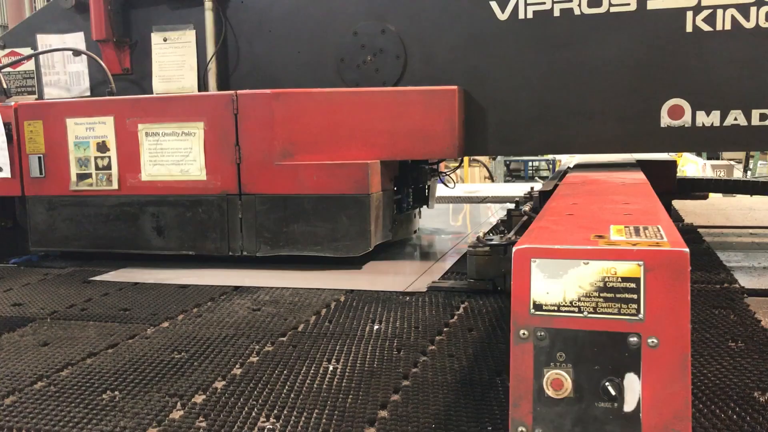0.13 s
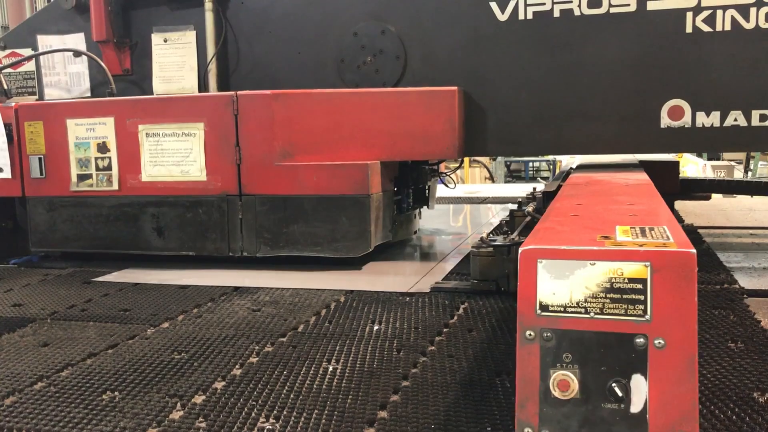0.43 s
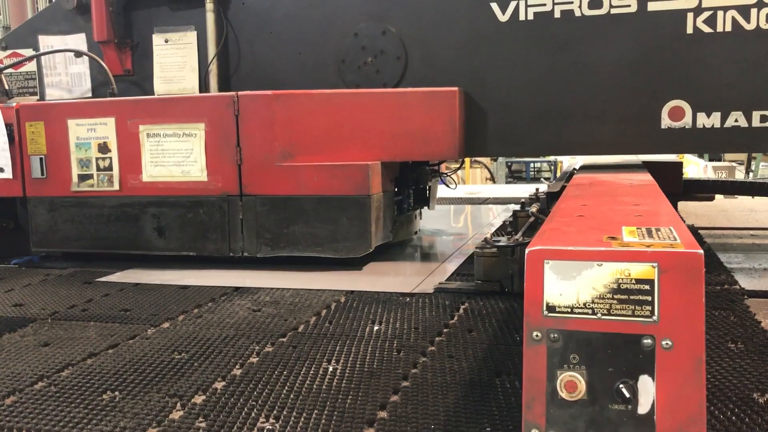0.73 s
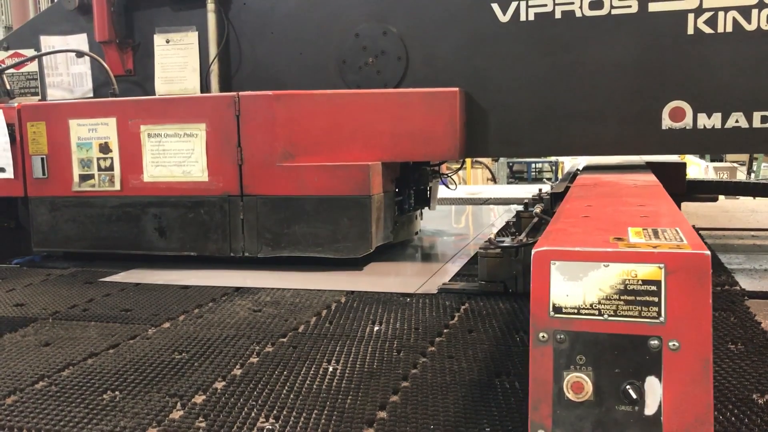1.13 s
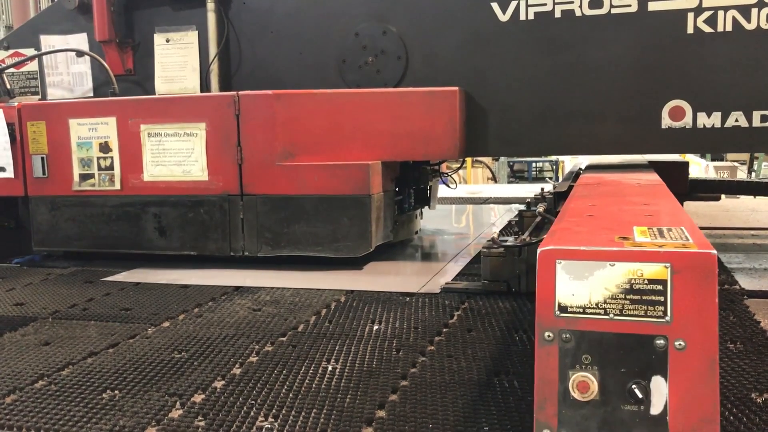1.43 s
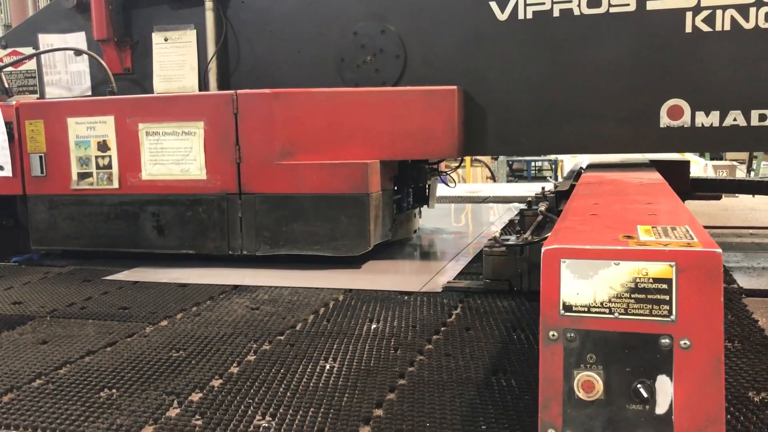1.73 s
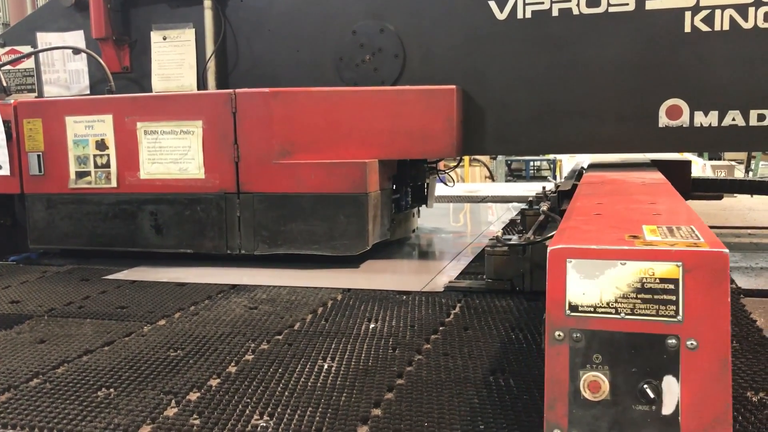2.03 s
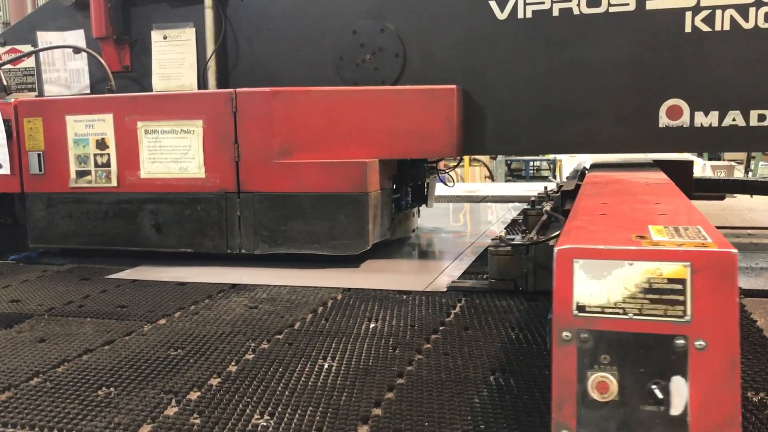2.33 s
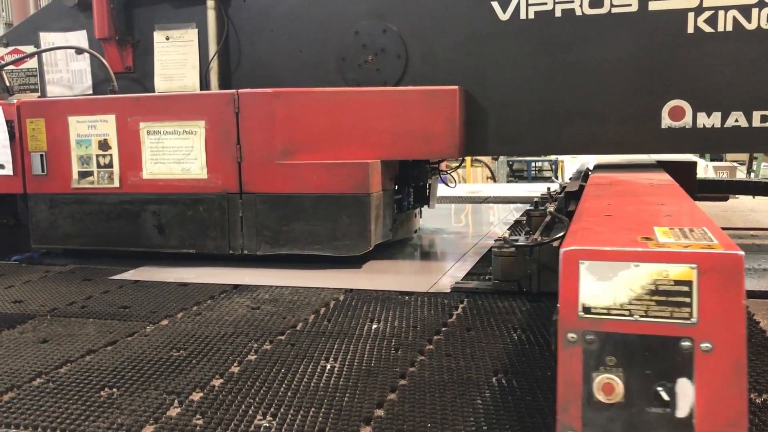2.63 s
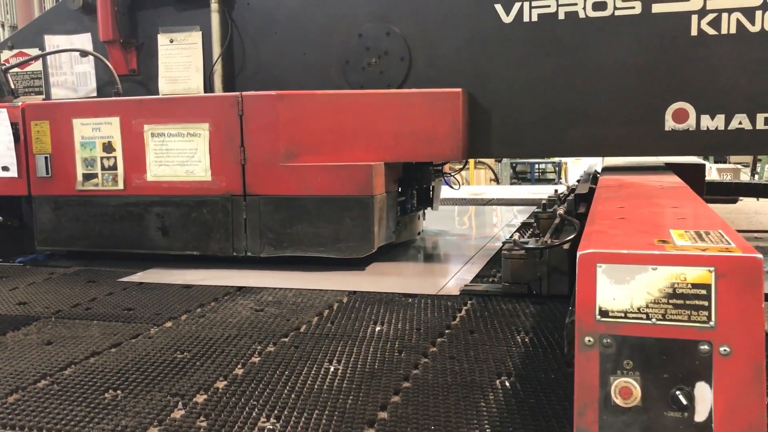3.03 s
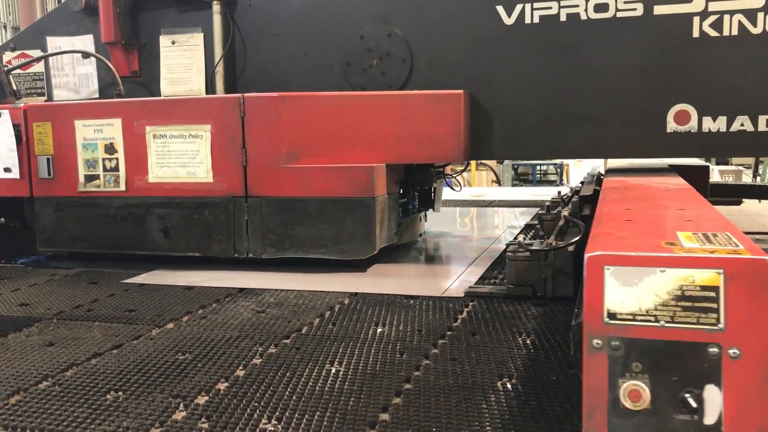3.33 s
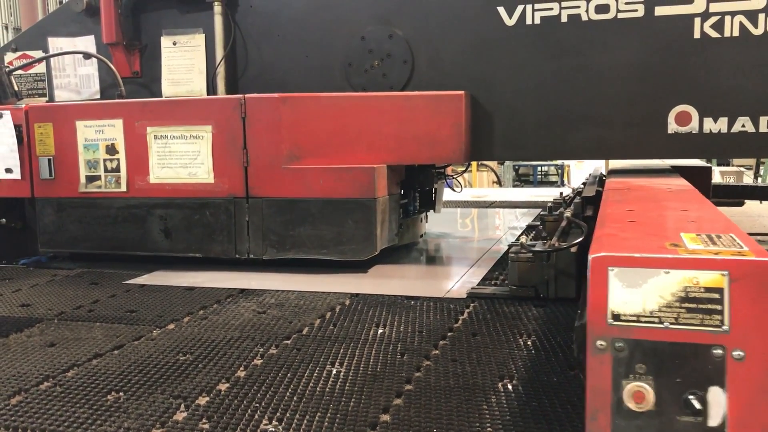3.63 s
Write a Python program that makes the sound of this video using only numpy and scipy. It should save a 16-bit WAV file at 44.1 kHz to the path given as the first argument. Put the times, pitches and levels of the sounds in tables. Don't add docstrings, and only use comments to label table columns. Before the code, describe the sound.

A punch press pounds sheet metal in a workshop, about three strokes a second. After a tiny silence and stuttered start around 0.1 s, each stroke gives a deep groaning thump, sharp snap, sheet slap and clattering return. The sheet rattles; high whines and faint whistles burst irregularly over pump hum. Compressed air sighs at 1.5-2.1 s, with a low pump moan from 1.8 to 2.8 s. Punching continues to the end.

```python
import sys
import numpy as np
from scipy import signal
from scipy.io import wavfile

SR = 44100
rng = np.random.default_rng(int(sys.argv[2]) if len(sys.argv) > 2 else 0)


def int16_out(signal):
    q = np.round(np.clip(np.atleast_2d(signal).T, -1, 1) * 32767)
    wavfile.write(sys.argv[1], SR, q.astype(np.int16))


def ratio(d):
    e = np.asarray(d, float) / 20
    return 10 ** e


N = 166698


def rms_one(x):
    return x / np.sqrt(np.mean(x ** 2) + 1e-20)


def drift(rate_hz):
    r = np.exp(-80 * np.pi * rate_hz / SR)
    slow = signal.lfilter([1], [1, -2 * r, r * r], rng.standard_normal(N // 40 + 2002))[2000:]
    return np.interp(np.arange(N) / 40, np.arange(len(slow)), rms_one(slow))


def resonate(x, hz, width_hz):
    r = np.exp(-np.pi * width_hz / SR)
    return signal.lfilter([1, 0, -1], [1, -2 * r * np.cos(2 * np.pi * hz / SR), r * r], x)


def band_pass(x, low_hz, high_hz):
    return signal.sosfilt(signal.butter(2, [low_hz, high_hz], "band", fs=SR, output="sos"), x)


def swell(t, attack_s, hold_s, release_s):
    time_left = attack_s + hold_s + release_s - t
    ramp = np.clip(np.minimum(t / attack_s, time_left / release_s), 0, 1)
    return np.sin(np.pi / 2 * ramp) ** 2


SHOP_DB, SHOP_PATCHY_DB = -29, 0.23
# hz, density_db (per Hz)
SHOP_COLOUR = [(20, -17.5), (165, .5), (437, -20.5), (1090, -19.5), (4200, -25.5), (7300, -36.5),
               (11000, -31), (15800, -45)]


def shop():
    out, edges_hz = 0, 22 * 2 ** np.arange(0, 9.6, .5)
    white = rng.standard_normal((2, N))
    points = np.array(SHOP_COLOUR)
    for k, (low_hz, high_hz) in enumerate(zip(edges_hz, edges_hz[1:])):
        band = band_pass(white[k % 2], low_hz, high_hz)
        level_db = np.interp(np.log(low_hz * high_hz) / 2, np.log(points[:, 0]), points[:, 1])
        out = out + ratio(level_db + SHOP_PATCHY_DB * drift(12.0)) * band
    return ratio(SHOP_DB) * rms_one(out)


HUM_PATCHY_DB = 2.0
# pitch_hz, width_hz, level_db (rms)
HUMS = [(58.2, 11, -39), (266.1, 14.4, -37.5), (536.6, 5.7, -48.5), (619, 68, -52), (1093, 11.6, -49.5),
        (1376.5, 46, -49.5), (2887, 42, -56), (3654, 230, -49), (6205, 460, -54.5), (9800, 34, -75),
        (10970, 820, -55.5)]


def hums():
    out = np.zeros(N)
    for hz, width_hz, level_db in HUMS:
        once = resonate(rng.standard_normal(N), hz, width_hz)
        hum = rms_one(resonate(once, hz, width_hz))
        out += ratio(level_db + HUM_PATCHY_DB * drift(9.8)) * hum
    return out


MOAN_EDGE_S = .04
# start_s, hold_s, pitch_hz, peak_db
MOANS = [
    (1.594, 0.095, 268, -29),
    (1.783, 1, 58.2, -34.5),
    (1.9, 0.37, 80.6, -38),
    (2.083, 0.11, 266, -34),
]


def moans():
    t, out = np.arange(N) / SR, np.zeros(N)
    for start_s, hold_s, hz, peak_db in MOANS:
        level = ratio(peak_db + HUM_PATCHY_DB * drift(8.5)) * swell(t - start_s, MOAN_EDGE_S, hold_s, MOAN_EDGE_S)
        out += level * np.sin(2 * np.pi * hz * t)
    return out


# time_s, level_db
AIR = [
    (1.52, -28),
    (1.6, -1.5),
    (1.67, 1.5),
    (1.78, -3),
    (1.901, -5),
    (2.1, -17),
]
# low_hz, high_hz, level_db
AIR_BANDS = [
    (604, 4300, -33.5),
    (4860, 7000, -41.5),
    (3210, 9500, -47),
]


def air():
    hiss = np.zeros(N)
    for low_hz, high_hz, level_db in AIR_BANDS:
        hiss += ratio(level_db) * rms_one(band_pass(rng.standard_normal(N), low_hz, high_hz))
    time_s, valve_db = np.transpose(AIR)
    return ratio(np.interp(np.arange(N) / SR, time_s, valve_db, left=-120, right=-120)) * hiss


def whine(bursts, hz, wander_hz, flutter_db, idle_db):
    t, level = np.arange(N) / SR, np.full(N, ratio(idle_db))
    for top_s, half_s, level_db in bursts:
        near = slice(int((top_s - half_s) * SR), int((top_s + 1.3 * half_s) * SR))
        since_start = t[near] - top_s + .8 * half_s
        level[near] += ratio(level_db) * swell(since_start, .55 * half_s, .45 * half_s, .9 * half_s)
    turns = np.cumsum(hz + wander_hz * drift(18.7)) / SR
    flutter = ratio(flutter_db * (drift(13) + drift(69)))
    return np.sqrt(2) * level * flutter * np.sin(2 * np.pi * turns)


# top_s, half_length_s, level_db
WHINE = [(0.141, 0.027, -34), (0.2, 0.09, -39.5), (0.258, 0.015, -38), (0.386, 0.03, -43),
         (0.483, 0.02, -32), (0.507, 0.023, -39.5), (0.583, 0.076, -36), (0.649, 0.013, -42),
         (0.703, 0.016, -38.5), (0.739, 0.028, -43), (0.82, 0.021, -36.0), (0.842, 0.014, -48),
         (0.914, 0.072, -37.5), (1.039, 0.022, -38), (1.088, 0.031, -40.5), (1.126, 0.018, -43.2),
         (1.153, 0.032, -35.5), (1.229, 0.037, -40.5), (1.499, 0.041, -33), (1.574, 0.063, -39),
         (1.723, 0.022, -39), (1.768, 0.059, -44), (1.819, 0.037, -38), (1.905, 0.023, -43),
         (1.954, 0.033, -36.5), (1.986, 0.026, -33.8), (2.039, 0.026, -38), (2.064, 0.019, -45),
         (2.123, 0.02, -45), (2.145, 0.027, -31.5), (2.17, 0.02, -46), (2.247, 0.017, -35.5),
         (2.277, 0.033, -32), (2.304, 0.02, -40), (2.396, 0.03, -33.5), (2.424, 0.02, -38.9),
         (2.517, 0.095, -34), (2.574, 0.022, -48), (2.602, 0.015, -39), (2.705, 0.02, -38),
         (2.732, 0.021, -33.5), (2.781, 0.043, -41), (2.823, 0.029, -31), (2.849, 0.018, -39.7),
         (2.903, 0.065, -34), (2.953, 0.031, -45), (3.049, 0.03, -44), (3.124, 0.019, -39),
         (3.224, 0.044, -34.5), (3.275, 0.015, -32.5), (3.376, 0.02, -41.4), (3.452, 0.045, -45.2),
         (3.493, 0.02, -43), (3.531, 0.021, -32), (3.564, 0.029, -28.5), (3.586, 0.017, -44.3),
         (3.609, 0.033, -36.5), (3.636, 0.028, -44.0), (3.713, 0.021, -37.4), (3.74, 0.022, -33.2)]
# top_s, half_length_s, level_db
WHISTLE = [(0.169, 0.038, -49), (0.21, 0.019, -43), (0.232, 0.02, -51), (0.47, 0.018, -55),
           (0.575, 0.081, -50.5), (0.705, 0.017, -51.4), (0.823, 0.014, -53.8), (0.871, 0.02, -52.8),
           (0.894, 0.02, -45), (1.039, 0.017, -58), (1.191, 0.069, -58), (1.378, 0.021, -51),
           (1.625, 0.069, -51), (1.709, 0.016, -47), (1.828, 0.051, -49.1), (1.944, 0.085, -55),
           (2.051, 0.028, -54), (2.143, 0.04, -57), (2.283, 0.07, -51), (2.393, 0.029, -52),
           (2.484, 0.028, -50.9), (2.576, 0.038, -50), (2.885, 0.041, -46.5), (2.922, 0.023, -55),
           (3.039, 0.034, -55), (3.135, 0.023, -54.2), (3.201, 0.1, -48), (3.374, 0.031, -53.2),
           (3.48, 0.024, -49.2), (3.518, 0.025, -52.7), (3.547, 0.033, -41.5), (3.581, 0.02, -46.4),
           (3.607, 0.022, -52.4), (3.731, 0.028, -49.2)]


def drives():
    main = whine(WHINE, 4588, wander_hz=10, flutter_db=1.4, idle_db=-53)
    whistle = whine(WHISTLE, 8066, wander_hz=6, flutter_db=1.5, idle_db=-62)
    upper = whine(WHISTLE, 8144, wander_hz=6, flutter_db=1.23 * 1.5, idle_db=-62 + 15)
    return main + whistle + ratio(-13) * upper


RATTLES_PER_S, RATTLE_DB, RATTLE_CYCLES = 600, -45, 10.6
RATTLE_LOW_HZ, RATTLE_HIGH_HZ, RATTLE_RINGS = 494, 1940, 16


def rattle():
    sizes = ratio(3.75 * np.minimum(rng.exponential(1, N), 4)) * rng.choice([-1, 1], N)
    ticks = sizes * (rng.random(N) < RATTLES_PER_S * ratio(4 * drift(9)) / SR)
    dealt = rng.integers(0, RATTLE_RINGS, size=N)
    rings = np.zeros(N)
    for k, hz in enumerate(np.geomspace(RATTLE_LOW_HZ, RATTLE_HIGH_HZ, RATTLE_RINGS)):
        rings += resonate(ticks * (dealt == k) + 1e-18, hz, 2.9 * hz / RATTLE_CYCLES)
    return ratio(RATTLE_DB) * rms_one(rings)


CONTACT_RISE_S, CONTACT_SPREAD_DB = .003, 1.2
SAME_EACH_TIME = .3
# break_through_s, slap_db (slap of the sheet as the ram lifts)
STROKES = [(0.0381, -4.5), (0.372, -3), (0.7062, -6), (1.0402, -5), (1.374, -1), (1.708, 0), (2.042, 1),
           (2.3752, -1), (2.7083, 1), (3.041, 0), (3.3746, 1), (3.7073, 0.1)]
# after_break_through_s, centre_hz, width_hz, level_db (rms), t60_s
CONTACTS = [(-.006, 1300, 500, -35, .2), (-.011, 2500, 2000, -35, .2), (-.010, 7000, 6000, -44, .1),
            (.0, 6000, 2500, -38, .12), (.0, 9800, 2000, -43, .12), (-.001, 13000, 5000, -44, .07),
            (.0, 600, 400, -37, .4), (-.036, 13000, 4000, -47, .05), (.061, 11500, 6000, -44, .08),
            (.064, 6000, 2500, -42, .3), (.068, 620, 400, -35, .35), (-.022, 3650, 200, -38, .35),
            (.127, 1100, 600, -33, .18), (.126, 1500, 400, -37, .3), (.127, 2500, 2000, -37, .3),
            (.13, 600, 300, -32, .25), (.132, 6200, 4000, -48, .4), (.14, 400, 120, -33, .3),
            (.07, 2500, 2000, -39, .3), (.145, 480, 250, -35, .15), (.137, 1350, 500, -36, .15),
            (.01, 430, 200, -37, .2), (-.0012, 8000, 7000, -31, .02), (-.0012, 13500, 4000, -42, .02)]


def contacts():
    size = SR // 3
    t, out = np.arange(size) / SR, np.zeros(N + 2 * SR)
    for after_s, hz, width_hz, level_db, t60_s in CONTACTS:
        noise = rng.standard_normal((len(STROKES) + 1, size))
        mixed = np.sqrt(SAME_EACH_TIME) * noise[0] + np.sqrt(1 - SAME_EACH_TIME) * noise[1:]
        clatter = rms_one(resonate(mixed, hz, width_hz))
        clatter *= np.minimum(t / CONTACT_RISE_S, 1) * ratio(level_db - 60 * t / t60_s)
        for (stroke_s, _), one, chance in zip(STROKES, clatter, rng.standard_normal(len(STROKES))):
            i = int((stroke_s + after_s) * SR) + SR
            out[i:i + size] += ratio(CONTACT_SPREAD_DB * chance) * one
    return out[SR:SR + N]


KNOCK_RISE_CYCLES, KNOCK_DETUNE = 2.5, .015
# after_break_through_s, pitch_hz, peak_db, t60_s
KNOCKS = [
    (-.0008, 5730, -23, 0.011),
    (-.0008, 9800, -26.5, 0.0071),
    (-.005, 1075, -28, .07),
    (-.004, 930, -32, .08),
    (.131, 1071, -27, .07),
    (.132, 960, -28, .05),
    (0.089, 660, -28, 0.053),
    (.126, 1200, -37, 0.13),
]
# after_break_through_s, pitch_hz, peak_db, t60_s
SLAPS = [
    (.075, 920, -30, 0.059),
    (0.074, 998, -26, 0.066),
    (.091, 960, -28, 0.06),
    (0.073, 1073, -31, 0.12),
]


def knocks():
    t, out = np.arange(SR // 8) / SR, np.zeros(N + 2 * SR)
    for stroke_s, slap_db in STROKES:
        rows = [(row, 0) for row in KNOCKS] + [(row, slap_db) for row in SLAPS]
        chances = rng.standard_normal((len(rows), 2))
        for ((after_s, hz, peak_db, t60_s), extra_db), (louder, sharper) in zip(rows, chances):
            i = int((stroke_s + after_s) * SR) + SR
            level = ratio(peak_db + extra_db + CONTACT_SPREAD_DB * louder - 60 * t / t60_s)
            rise = np.minimum(t * hz / KNOCK_RISE_CYCLES, 1)
            ring = np.sin(2 * np.pi * hz * (1 + KNOCK_DETUNE * sharper) * t)
            out[i:i + len(t)] += level * rise * ring
    return out[SR:SR + N]


GROAN_ATTACK_S, GROAN_RELEASE_S = .014, .022
GROAN_SPREAD_DB, GROAN_SLIP_S = .5, .0001
RETURN_AFTER_S, RETURN_SLIP_S = .1, .0004
# after_break_through_s, hold_s, pitch_hz, peak_db
GROANS = [(-.096, .022, 197, -33), (-.09, .022, 144, -32.5), (-.088, .06, 95, -32), (-.054, .06, 256, -35),
          (-.045, .022, 67, -29.5), (-.045, .01, 211, -35), (-.031, .06, 177, -25.5),
          (-.027, .06, 292, -35), (-.025, .06, 146.5, -14), (-.024, .06, 192, -31), (-.021, .038, 159, -27),
          (-.009, 0.025, 223, -23.5), (.007, 0.028, 123, -27.5), (.012, 0.065, 81.5, -31),
          (.051, .001, 268.5, -32), (.057, 0.037, 140.6, -32), (.06, 0.031, 185.5, -34.5),
          (.109, .06, 106.9, -29), (.115, 0.018, 391, -37.5), (.116, 0.024, 272.6, -33),
          (.117, .01, 231, -23.5), (.122, 0.021, 72.3, -29), (.124, .038, 178.4, -24),
          (.132, 0.024, 274, -19), (.138, 0.074, 321, -34.5), (.142, 0.056, 210.9, -25),
          (.144, .06, 142.4, -30.5), (.162, .038, 271.7, -32.5), (.183, 0.026, 222.6, -32.5)]


def groans():
    t, out = np.arange(N) / SR, np.zeros(N)
    for stroke_s, _ in STROKES:
        chances = rng.standard_normal((len(GROANS), 2))
        late_s = RETURN_SLIP_S * rng.standard_normal()
        near = slice(max(int((stroke_s - .1) * SR), 0), int((stroke_s + .32) * SR))
        for (after_s, hold_s, hz, peak_db), (louder, slip) in zip(GROANS, chances):
            u = t[near] - stroke_s - after_s - GROAN_SLIP_S * slip - late_s * (after_s > RETURN_AFTER_S)
            level = ratio(peak_db + GROAN_SPREAD_DB * louder) * swell(u, GROAN_ATTACK_S, hold_s, GROAN_RELEASE_S)
            out[near] += level * np.sin(2 * np.pi * hz * u)
    return out


def scene():
    background = shop() + hums() + moans() + air() + drives()
    press = rattle() + contacts() + knocks() + groans()
    return (background + press)[None, :]


def band_limit(x):
    return signal.sosfilt(signal.butter(12, 16330, fs=SR, output="sos"), x)


START_S, BUFFER = .0973, 512


def record(dry):
    y = signal.sosfilt(signal.butter(3, 40, "high", fs=SR, output="sos"), dry)
    y = signal.sosfilt(signal.ellip(12, .5, 70, 15790, fs=SR, output="sos"), y)
    i, mix = int(START_S * SR), y.copy()
    mix[:, :i + 2 * BUFFER] = 0
    fade = np.clip(np.arange(BUFFER, 0, -1) / 128, 0, 1)
    mix[:, i:i + BUFFER] = y[:, i + 2 * BUFFER:i + 3 * BUFFER] * fade
    return band_limit(mix)


dry = scene()
out = record(dry)
int16_out(out)
```